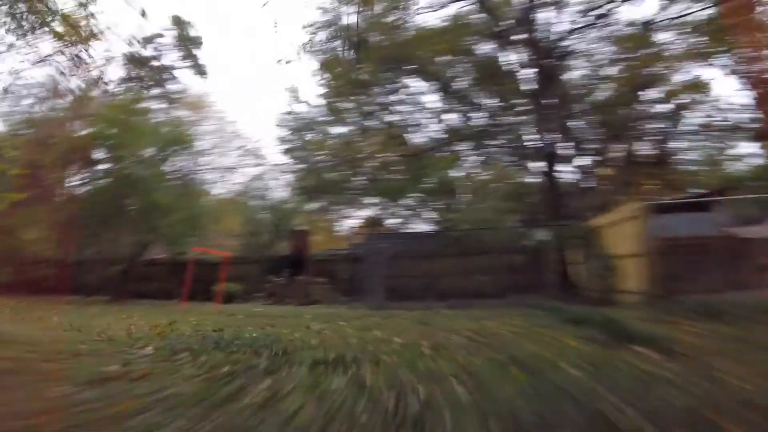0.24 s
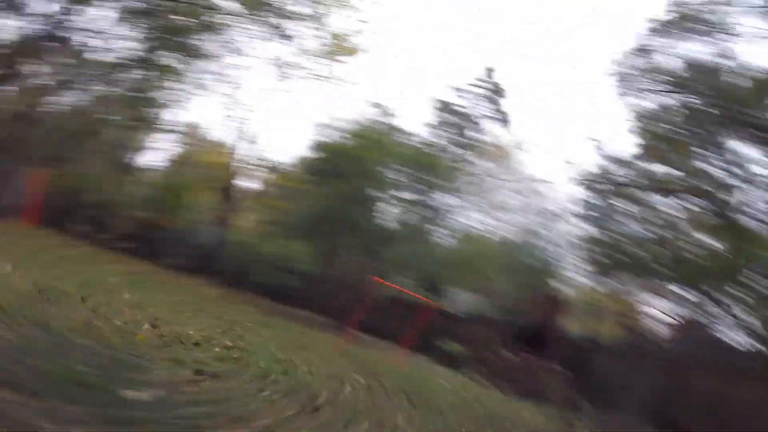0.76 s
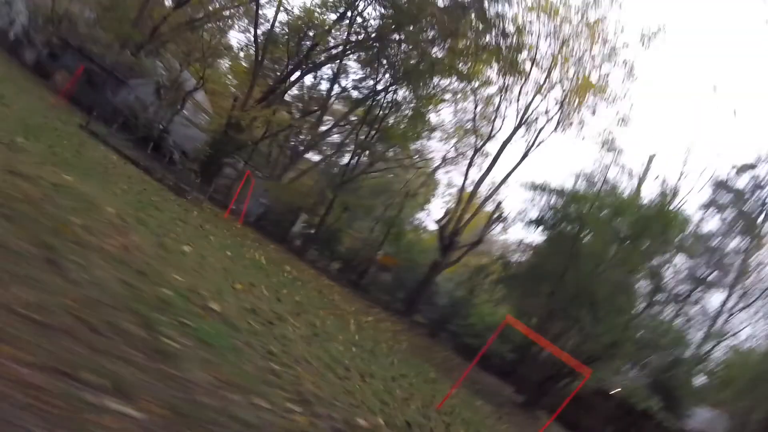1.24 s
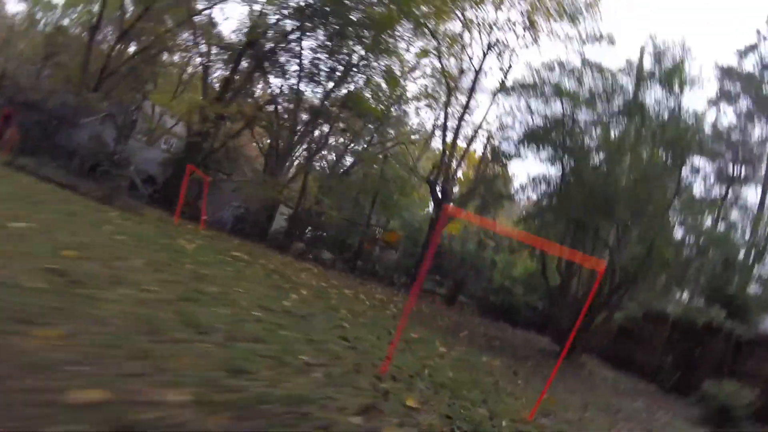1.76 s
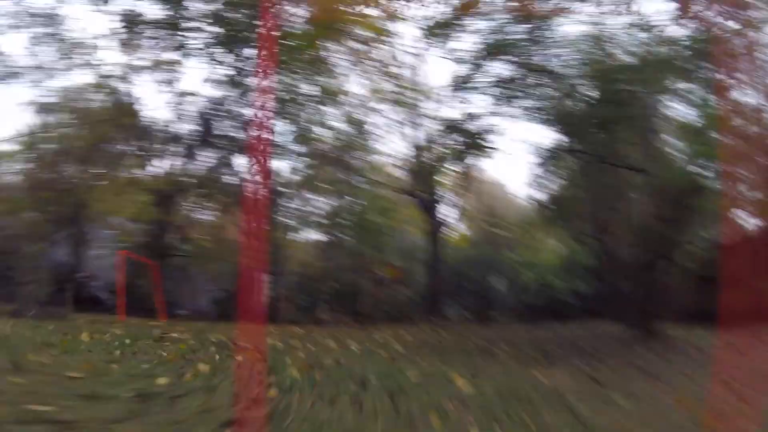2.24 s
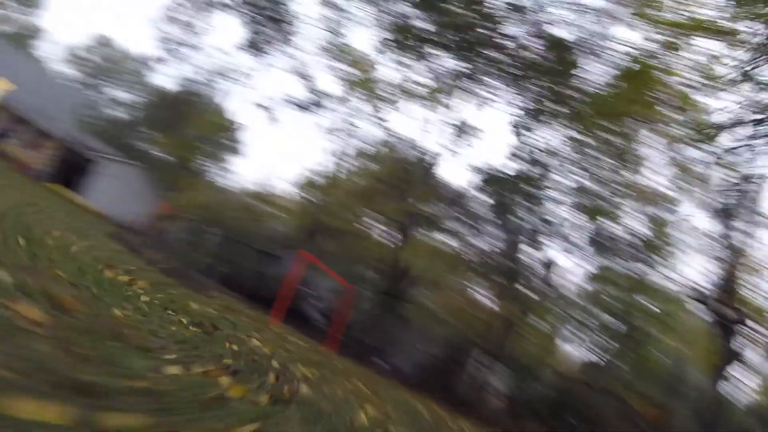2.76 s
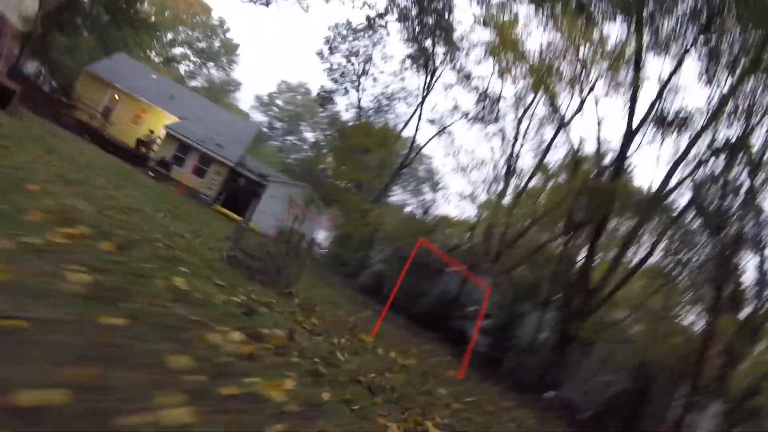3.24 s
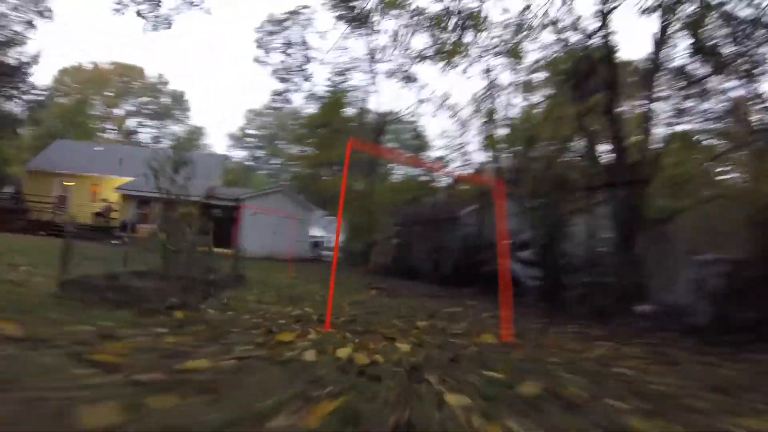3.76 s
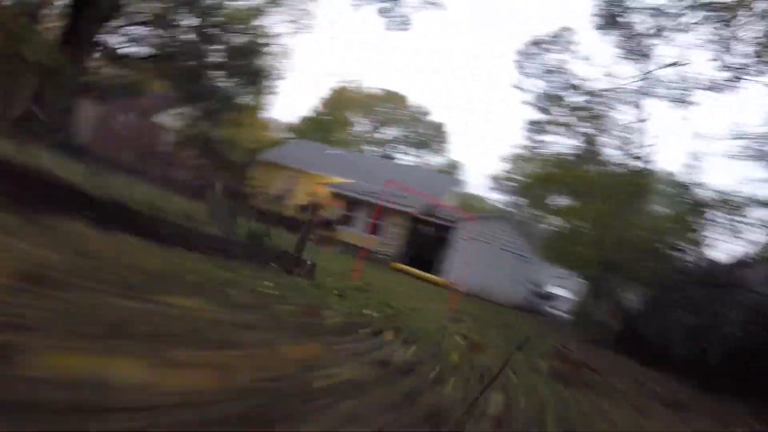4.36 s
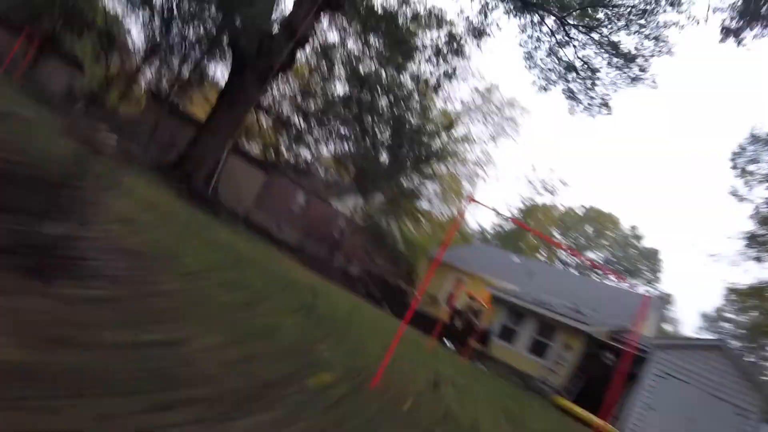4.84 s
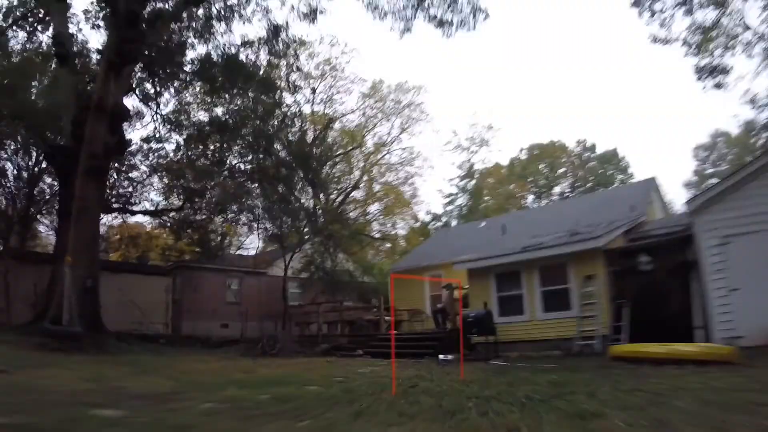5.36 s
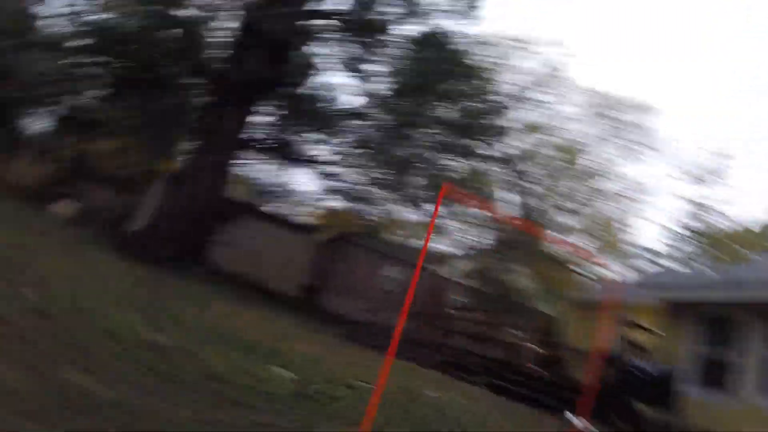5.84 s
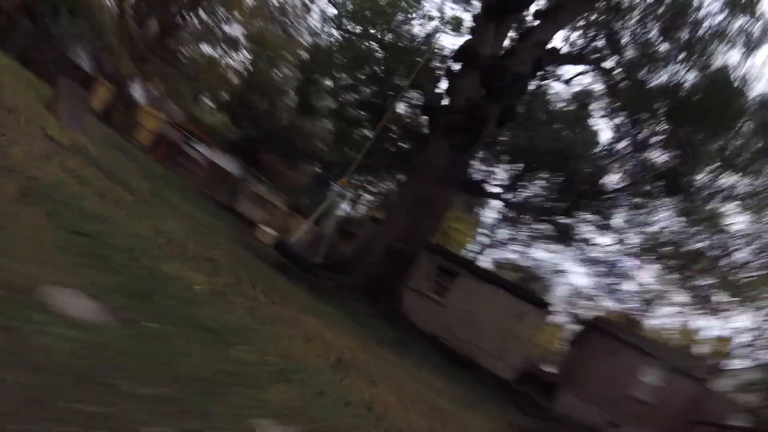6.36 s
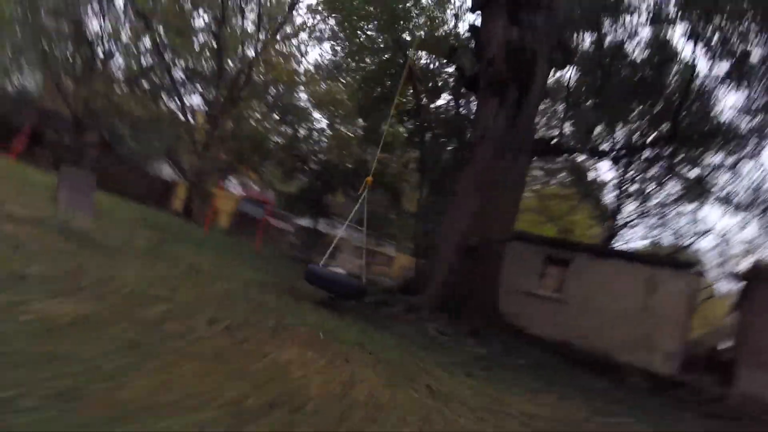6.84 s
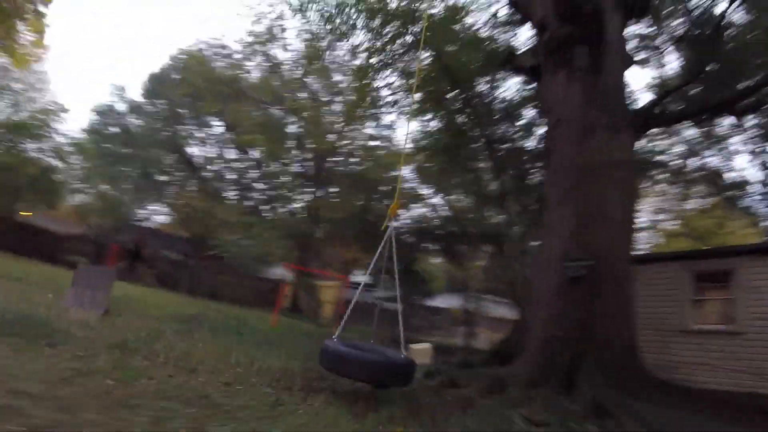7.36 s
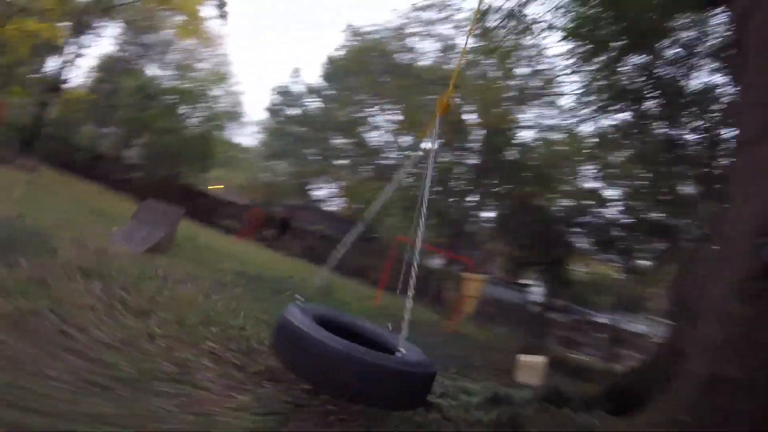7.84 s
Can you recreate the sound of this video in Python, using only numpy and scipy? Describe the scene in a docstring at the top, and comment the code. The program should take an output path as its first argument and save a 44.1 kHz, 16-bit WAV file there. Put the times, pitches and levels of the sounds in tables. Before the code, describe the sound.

Close, dry onboard microphone on a racing quadcopter flying over a lawn. The continuous, wavering propeller drone hisses harder in tight turns, sags when the throttle eases, then climbs again. Wind buffets low underneath. One hard, brief crack with a dull thump comes at about four and a half seconds, the level ducking around it and creeping back while the motors keep whining to the end.

```python
"""A small racing quadcopter, heard by the camera strapped to its frame: four three-blade propellers whine,
each at its own speed. Each whine is a stack of sine waves locked to the turning of one shaft, with a low hum.
Blade hiss, downwash, frame rumble and wind on the microphone are noise, each given its own colour.
A leaf or twig strikes a propeller once: a snap, a short ring and a low thump. The camera's gain control
ducks ahead of the snap and creeps back."""
import sys
import numpy as np
from scipy.fft import rfft, irfft, next_fast_len
from scipy.io import wavfile
from scipy.ndimage import uniform_filter1d, map_coordinates

SR = 44100
rng = np.random.default_rng(int(sys.argv[2]) if len(sys.argv) > 2 else 0)


def to_wav(sig):
    """Store sig (one row per channel, or 1-D mono) as 16-bit WAV at the path in sys.argv[1].

    Samples outside -1..1 are clipped; the rate is SR.
    """
    pcm = np.clip(np.atleast_2d(sig), -1, 1) * 32767
    pcm = np.round(pcm).astype(np.int16)
    wavfile.write(sys.argv[1], SR, pcm.T)  # frames by channels


N = 356769  # length [samples]
BLADES = 3  # blades on each propeller
CRUISE_HZ = 500  # blade pitch at which the level laws start [Hz]


def amp(db):
    """Gain of a level in dB."""
    return 10 ** (np.asarray(db) / 20)


def unit(x):
    """x scaled to an rms of 1."""
    return x / np.sqrt(np.mean(x ** 2))


def curves(rows):
    """Straight lines between the table rows: one value per sample for each column after the time."""
    times, *columns = np.transpose(rows)
    return np.array([np.interp(np.arange(N) / SR, times, column) for column in columns])


def wobble(rate):
    """A smooth random curve with `rate` random points a second."""
    points = rng.standard_normal(int(N * rate / SR) + 4)
    return map_coordinates(points, [np.arange(N) * rate / SR])


def bump(middle, width):
    """A smooth rise and fall, down to 37 % at `width` seconds from the middle."""
    return np.exp(-((np.arange(N) / SR - middle) / width) ** 2)


def filtered(x, response):
    """x with each frequency multiplied by the response; the padding keeps the end off the start."""
    size = next_fast_len(N + 8192)
    return irfft(rfft(x, size) * response(np.fft.rfftfreq(size, 1 / SR)), size)[..., :N]


def coloured(x, spectrum):
    """x filtered to the colour of a (frequency, level) table, at an rms of 1."""
    f, db = np.transpose(spectrum)

    def response(hz):
        return amp(np.interp(np.log(hz + 1), np.log(f), db, -120, -120))
    return unit(filtered(x, response))


# Colour of the steady frame rumble: (frequency [Hz], level [dB per Hz])
RUMBLE = [(12, -21.5), (25, -2.5), (60, -1), (90, -1.5), (130, -25.5)]


def frame_rumble():
    """The frame's steady rumble is low noise."""
    return amp(-40) * coloured(rng.standard_normal(N), RUMBLE)


# Strength of the wind on the microphone: (time [s], level [dB])
WIND = [(0.0, -32.5), (0.75, -35.5), (1.06, -38), (1.75, -35), (2.0, -29.5), (2.72, -28), (2.88, -33),
        (3.36, -34.5), (3.64, -31), (4.4, -28), (4.9, -25.5), (5.46, -29.5), (6.04, -32), (6.68, -39.5),
        (7.5, -36), (8.08, -33)]


def wind_db():
    """Slow rise and fall of the wind, in dB."""
    return curves(WIND)[0]


# Colour of the wind: (frequency [Hz], level [dB per Hz])
BUFFET = [(15, -19), (28, -13), (60, -7), (110, -5), (200, -10.5), (400, -21)]


def wind():
    """Wind buffets the microphone: low noise in uneven lumps."""
    lumps_db = 0.51 * wobble(14)
    return amp(wind_db() + lumps_db) * coloured(rng.standard_normal(N), BUFFET)


# Colour of the downwash: (frequency [Hz], level [dB per Hz])
DOWNWASH = [(80, -24), (200, 3.5), (450, 6), (800, 1.5), (1500, -4.5), (3000, -15.5)]


def downwash():
    """Air pushed down by the propellers churns: noise that follows the hiss, the wind and the turns."""
    churn_db = sum(extra_db * bump(middle, width) for middle, width, _, extra_db in TURNS)
    level_db = churn_db + 0.31 * hiss_db() + 0.5 * wind_db() - 5.0
    return amp(level_db) * coloured(rng.standard_normal(N), DOWNWASH)


def hiss_db():
    """Blades hiss louder when they turn faster or carry more load."""
    octaves = np.log2(pitches().mean(axis=0) / CRUISE_HZ)
    return -39 + 14 * octaves + load_db()


# Colour of the blade hiss: (frequency [Hz], level [dB per Hz])
HISS = [(500, -16), (1100, 1), (2000, 2.5), (3150, 1.5), (4150, -7), (5000, -1), (5600, -5.5), (6500, -6.5),
        (7100, -16.5), (8900, -20), (9600, -29.5), (10300, -64)]
# Extra level of the hiss above 3800 Hz: (time [s], level [dB])
TREBLE = [(0, -1.1), (1.25, -1.9), (1.5, 0.32), (4.75, 1.2), (5.4, 0.34)]


def blade_hiss(angles):
    """Air tears off the blade tips: noise that swells each time a blade sweeps past."""
    ruffle = amp(0.4 * wobble(60) + 0.27 * wobble(200))
    sweep = 1 + 0.2 * np.cos(BLADES * angles).sum(axis=0)
    hiss = amp(hiss_db()) * coloured(rng.standard_normal(N) * sweep * ruffle, HISS)
    treble = filtered(hiss, lambda hz: hz > 3800)
    return hiss + (amp(curves(TREBLE)[0]) - 1) * treble


# The one strike: (time [s], level of snap and ring [dB], level of thump [dB])
STRIKE = (4.5222, -12, -12)
# Ringing of the struck propeller: (frequency [Hz], level within the ring [dB], time to fall 60 dB [s])
BLADE = [(1100, 2, .018), (1270, -5, .09), (2840, -4, .012), (3420, -7, .012), (4900, -14, .016)]


def strike():
    """A broad snap rings the propeller; the frame answers with one low thump."""
    start, snap_db, thump_db = STRIKE
    t = np.maximum(np.arange(N) / SR - start, 0)
    held = np.maximum(t - .004, 0)  # snap and ring start to die away after 4 ms
    contact = np.clip(t / 0.00071, 0, 1) * amp(-60 * held / 0.016)
    # Colour of the snap: (frequency [Hz], level [dB per Hz])
    snap_colour = [(600, 7.5), (3000, -5.5), (7500, -12.5), (11000, -39.0)]
    snap = contact * coloured(rng.standard_normal(N), snap_colour)
    ring = sum(amp(db - 60 * held / t60) * np.sin(2 * np.pi * hz * t) for hz, db, t60 in BLADE)
    ring *= np.clip(t / .003, 0, 1)
    late = np.maximum(t - .005, 0)  # the thump comes 5 ms after the snap
    thump = -amp(-60 * late / .07) * np.sin(2 * np.pi * 85 * late)
    return amp(snap_db) * (ring + .65 * snap) + amp(thump_db) * thump


# Hard turns: (middle [s], half width [s], blade load [dB], extra downwash [dB])
TURNS = [(1.153, 0.37, 7.5, 2.5), (2.85, 0.35, 2, 1), (6.0, 0.39, 5, 2)]


def load_db():
    """Extra blade load, rising and falling through each turn."""
    return sum(db * bump(middle, width) for middle, width, db, _ in TURNS)


# Blades passing per second, before rocking and hunting:
# (time [s], slow rotor [Hz], near rotor [Hz], far rotor [Hz], fourth rotor [Hz])
ROTORS = [(0.0, 475.0, 530.0, 571.0, 528.0), (0.44, 458.0, 536.0, 555.0, 516.0),
          (0.68, 434.0, 503.0, 511.0, 514.0), (0.88, 425.0, 481.0, 518.0, 512.0),
          (1.0, 418.0, 477.0, 520.0, 537.0), (1.115, 445.0, 481.0, 526.0, 524.0),
          (1.2, 417.0, 478.0, 521.0, 559.0), (1.27, 463.0, 471.0, 517.0, 533.0),
          (1.345, 439.0, 470.0, 514.0, 551.0), (1.405, 460.0, 464.0, 506.0, 548.0),
          (1.47, 422.0, 455.0, 496.0, 516.0), (1.64, 399.0, 451.0, 486.0, 489.0),
          (1.74, 412.0, 472.0, 495.0, 487.0), (1.92, 451.0, 503.0, 525.0, 507.0),
          (2.12, 459.0, 511.0, 565.0, 533.0), (2.3, 469.0, 538.0, 573.0, 536.0),
          (2.61, 456.0, 534.0, 566.0, 540.0), (2.76, 481.0, 564.0, 593.0, 570.0),
          (2.86, 462.0, 550.0, 582.0, 567.0), (3.08, 411.0, 479.0, 507.0, 518.0),
          (3.3, 406.0, 464.0, 482.0, 493.0), (3.41, 424.0, 466.0, 490.0, 490.0),
          (3.49, 391.0, 418.0, 445.0, 468.0), (3.66, 404.0, 427.0, 468.0, 456.0),
          (3.73, 397.0, 450.0, 478.0, 478.0), (3.8, 440.0, 505.0, 520.0, 515.0),
          (3.92, 494.0, 563.0, 578.0, 561.0), (4.13, 471.0, 533.0, 556.0, 549.0),
          (4.4, 478.0, 537.0, 559.0, 559.0), (4.48, 486.0, 555.0, 564.0, 560.0),
          (4.6, 509.0, 550.0, 592.0, 568.0), (4.84, 470.0, 550.0, 585.0, 584.0),
          (4.9, 481.0, 535.0, 572.0, 548.0), (4.96, 422.0, 497.0, 530.0, 505.0),
          (5.01, 407.0, 452.0, 485.0, 475.0), (5.18, 389.0, 430.0, 468.0, 455.0),
          (5.24, 408.0, 414.0, 479.0, 445.0), (5.3, 370.0, 432.0, 442.0, 440.0),
          (5.36, 388.0, 410.0, 452.0, 443.0), (5.41, 371.0, 428.0, 438.0, 445.0),
          (5.5, 384.0, 440.0, 492.0, 452.0), (5.6, 390.0, 460.0, 482.0, 462.0),
          (5.67, 418.0, 498.0, 533.0, 495.0), (5.74, 425.0, 502.0, 543.0, 512.0),
          (5.92, 482.0, 565.0, 612.0, 566.0), (6.04, 489.0, 570.0, 625.0, 578.0),
          (6.28, 470.0, 549.0, 595.0, 573.0), (6.4, 460.0, 538.0, 569.0, 542.0),
          (6.54, 434.0, 505.0, 528.0, 517.0), (7.0, 474.0, 523.0, 526.0, 536.0),
          (7.22, 449.0, 495.0, 520.0, 524.0), (7.66, 429.0, 484.0, 501.0, 501.0),
          (8.0, 458.0, 508.0, 519.0, 540.0), (8.08, 445.0, 462.0, 498.0, 519.0)]
# The attitude control rocks the rotors to and fro: (middle [s], half width [s], swings a second [Hz],
# greatest swing of slow [%], near [%], far [%], fourth rotor [%])
SHUDDERS = [(2.113, .065, 9.5, 4.2, -5, 1.5, 0), (6.15, .3, 8.8, .9, .4, -.5, .3)]


def pitches():
    """Blade pitch of each rotor in Hz, rocked up and down by the shudders."""
    rocking = 0
    for middle, width, rate, *swings in SHUDDERS:
        swing = np.cos(2 * np.pi * rate * (np.arange(N) / SR - middle))
        rocking = rocking + np.outer(swings, bump(middle, width) * swing)
    return curves(ROTORS) * (1 + rocking / 100)


def shaft_angles():
    """Turning angle of each rotor; the speed controllers hunt around the set speed, more under load."""
    hunting = np.array([.004 * wobble(9) + .0045 * wobble(20) + .0012 * wobble(45) for _ in SHAFT])
    hunting *= amp(.6 * load_db())
    return 2 * np.pi * np.cumsum(pitches() * (1 + hunting), axis=1) / SR / BLADES


def levels(laws, drift):
    """Level of each rotor from its pitch, the load and a slow drift; the fourth rotor does not drift."""
    base, per_octave, per_load = np.transpose(laws)[..., None]
    octaves = np.log2(pitches() / CRUISE_HZ)
    drift_db = np.vstack([curves(drift), np.zeros(N)])
    return base + per_octave * octaves + per_load * load_db() + drift_db


def tone(angle, order, flutter_db):
    """A sine wave `order` times as fast as the shaft, rms about 1; disturbed inflow makes it flutter."""
    flutter = amp(flutter_db * wobble(18))
    return np.sqrt(2) * flutter * np.sin(order * angle + rng.uniform(0, 2 * np.pi))


# Waves per turn of the shaft hum, which comes from unbalance and unequal blades
SHAFT_ORDERS = (1, 2, 4)
# Hum levels before the drift, a row for each rotor: one level [dB] for each of those orders
SHAFT = [(-33, -43.5, -55), (-39, -46.5, -53), (-40, -49, -55.5), (-30.5, -41.5, -53.5)]
# Slow drift of the shaft hum: (time [s], level [dB])
HUM = [(0, 0.5), (.9, 1.5), (3.5, -1)]


def shaft_hum(angle, orders_db):
    """An uneven propeller shakes a few times each turn: a low hum under the whine."""
    hum = sum(amp(db) * tone(angle, order, flutter_db=1.0) for order, db in zip(SHAFT_ORDERS, orders_db))
    return amp(curves(HUM)[0]) * hum


# Overtones 3 to 6 of the blade tone against overtone 2, a row for each rotor: four levels [dB]
OVERTONES = [(0, -3, -8.5, -8), (-7, -15, -21, -18.5), (-4, -8.5, -13.5, -15.5), (-5, -9.5, -16.5, -18.5)]
# Extra level of overtone 3; overtone 4 leans the other way: (time [s], level [dB])
THIRD = [(0, -9), (.45, -4.5), (.9, 1.2), (4.2, 1.5), (6.3, 0), (7.0, -4.5), (7.8, 1)]
# Level law of the blade tone, a row for each rotor:
# (level at cruise pitch [dB], change with pitch [dB per octave], change with load [dB per dB])
TONE_LAW = [(-22.5, 10.5, -0.38), (-30, 8.5, 0.49), (-33, 8.5, -0.27), (-34.5, 5.5, -0.55)]
# Level law of the overtones, a row for each rotor, with the same columns
OVERTONE_LAW = [(-49.5, 16, -0.3), (-38, 16, 0.032), (-44, 16, 0.63), (-47, 16, 1.05)]
# Drift of the blade tones on top of their law: (time [s], slow rotor [dB], near rotor [dB], far rotor [dB])
STRENGTH = [(0, -3, -1.5, 2), (2.3, 1, -0.58, 2), (3.6, -1, 0.73, 0.5), (4.7, -0.2, 2, 3),
            (5.3, 0.5, 2.4, 7), (6.05, -3, 1.6, -2.5), (8.08, 0.4, -0.84, 0.8)]
# Drift of the overtones on top of their law: (time [s], slow rotor [dB], near rotor [dB], far rotor [dB])
BRIGHTNESS = [(0, -13, -2, -8.5), (.8, 3, 0.8, 2), (1.9, 9, 1.5, 2), (2.2, 0.5, 2, -9.5),
              (4.2, 2.5, 1, 2.5), (5.3, 2.5, 1, 2.5), (6.05, 1.5, -1, 1.5), (6.802, 3.5, 4, -5.5),
              (8.08, 3.5, 3.5, -1)]


def propeller_whine(angles):
    """Each passing blade pushes the air: a blade tone with overtones, over the shaft hum, for each rotor."""
    whine = np.zeros(N)
    third_db, = curves(THIRD)
    lean = {3: third_db, 4: -.6 * third_db}
    tone_db, overtone_db = levels(TONE_LAW, STRENGTH), levels(OVERTONE_LAW, BRIGHTNESS)
    for angle, hum_db, main_db, bright_db, overtones in zip(angles, SHAFT, tone_db, overtone_db, OVERTONES):
        whine += shaft_hum(angle, hum_db)
        whine += amp(main_db) * tone(angle, BLADES, flutter_db=1.0)
        for multiple, db in enumerate((0, *overtones), 2):
            gain = amp(bright_db + db + lean.get(multiple, 0))
            whine += gain * tone(angle, multiple * BLADES, flutter_db=1.5)
    return whine


def scene():
    """Everything reaches the one microphone at close range."""
    angles = shaft_angles()
    air = frame_rumble() + wind() + downwash() + blade_hiss(angles)
    return (air + strike() + propeller_whine(angles))[None]


def gain_control(x, cut_db, recovery):
    """A sharp treble peak cuts the gain a little ahead of itself; the gain then climbs back evenly in dB."""
    treble = filtered(x, lambda hz: hz > 2200)
    over = np.abs(treble) > .12
    ahead = round(.0555 * SR)  # look-ahead of 55.5 ms
    seen = np.pad(over[ahead:], (0, ahead))
    n = np.arange(N)
    last_seen = np.maximum.accumulate(np.where(seen, n, -10 * N))
    since = (n - last_seen) / SR
    gain = amp(-cut_db * np.clip(1 - since / recovery, 0, 1))
    return x * uniform_filter1d(gain, size=60)


def housing_notch(hz):
    """The housing cancels most of a narrow band near 6 kHz."""
    offset = 1 - (hz / 6020) ** 2
    return (offset + .008j) / (offset + .2j)


def record(dry):
    """The camera's sound path: housing, gain control, then nothing above 10250 Hz."""
    x = filtered(dry[0], housing_notch)
    x = gain_control(x, cut_db=12.5, recovery=1.8)  # recovery [s]
    return filtered(x, lambda hz: hz < 10250)[None]


dry = scene()
out = record(dry)
to_wav(out)
```